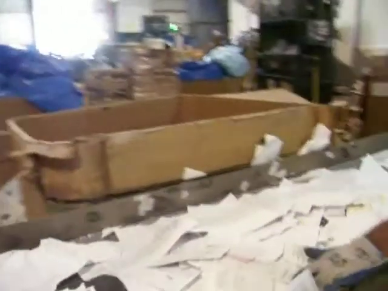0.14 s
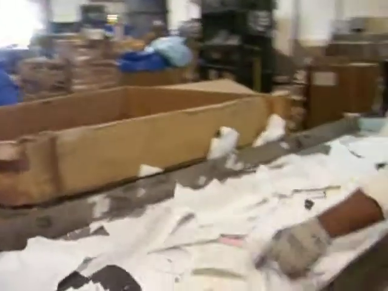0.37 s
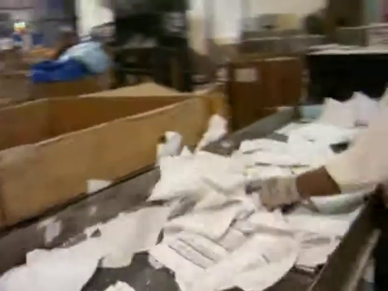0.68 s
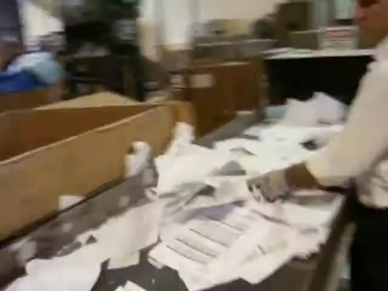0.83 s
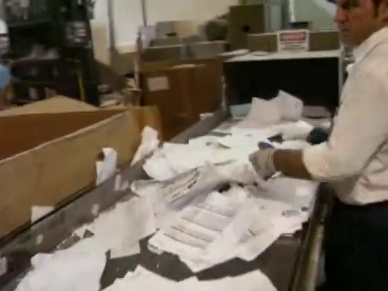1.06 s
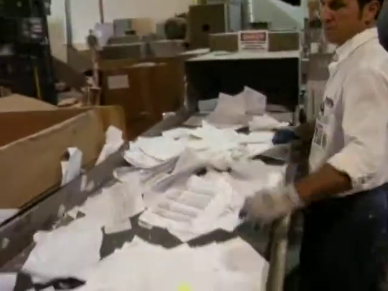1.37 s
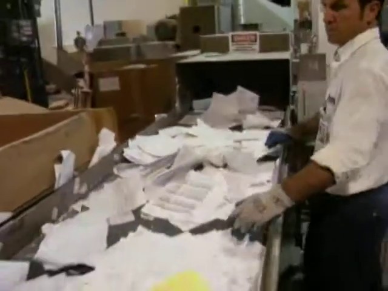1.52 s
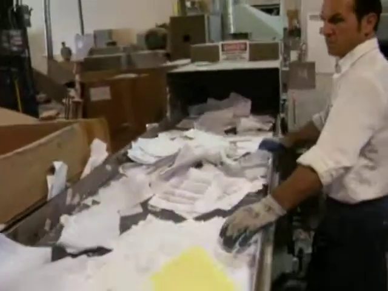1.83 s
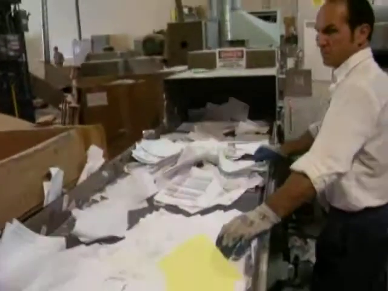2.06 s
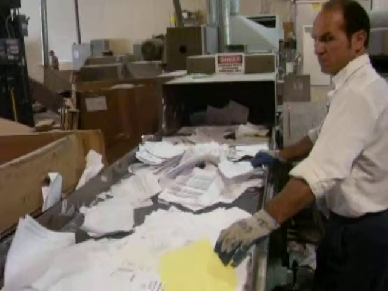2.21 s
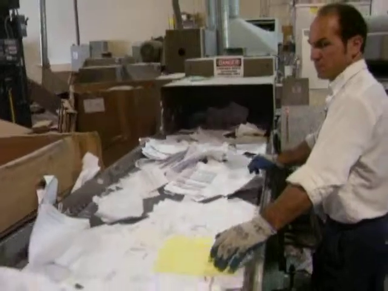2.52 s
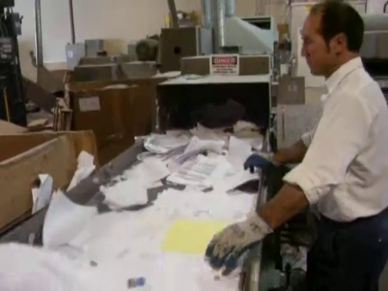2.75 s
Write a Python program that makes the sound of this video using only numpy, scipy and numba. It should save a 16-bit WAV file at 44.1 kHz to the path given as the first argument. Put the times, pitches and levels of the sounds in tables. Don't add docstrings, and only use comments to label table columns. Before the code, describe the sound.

A dense conveyor and shredder roar runs throughout, with wavering motor hum, blower tones and thin gear whine in a reverberant warehouse. Paper crushes and snaps around 0.45-0.6 s; dull knocks cluster at 0.6-1.0. Metal clangs and paper sound at 1.33-1.5, a hard knock at 2.26, the loudest paper crush at 2.4. The narrow, muffled camera microphone pumps, distorts and ticks.

```python
import sys
import numpy as np
from scipy import signal
from scipy.io import wavfile
from scipy.ndimage import uniform_filter1d
from numba import njit

SR = 44100
rng = np.random.default_rng(int(sys.argv[2]) if len(sys.argv) > 2 else 0)


def dump_mix(stems):
    frames = np.atleast_2d(stems).T
    limited = np.clip(frames, -1, 1)
    pcm = np.round(limited * 32767).astype(np.int16)
    wavfile.write(sys.argv[1], SR, pcm)


def invert_db(level):
    return 10 ** (np.asarray(level, dtype=float) / 20)


N = 126126


@njit
def svf(x, hz, width):
    y, band, low = np.empty(len(x)), 0., 0.
    g, k = np.tan(np.pi * hz / SR), width / hz
    for i in range(len(x)):
        v = (band + g * (x[i] - low)) / (1 + g * (g + k))
        band, low, y[i] = 2 * v - band, low + 2 * g * v, k * v
    return y


def noise_band(hz, width):
    noise = rng.standard_normal(N)
    return svf(svf(noise, 1. * hz, 1. * width), 1. * hz, 1. * width)


def level(x, db):
    return x * invert_db(db) / np.sqrt(np.mean(x ** 2))


def walk(rate):
    hold = int(SR / rate)
    steps = np.repeat(rng.standard_normal(N // hold + 1), hold)
    return 1.28 * uniform_filter1d(uniform_filter1d(steps, hold), hold)[:N]


def ring(start, hz, t60):
    t = np.maximum(np.arange(N) / SR - start, 0)
    return np.sin(2 * np.pi * hz * t) * np.exp(-np.log(1000) * t / t60)


# (frequency [Hz], density [dB per Hz])
ROAR_SPECTRUM = [(29, -52), (50, -7), (197, -10), (257, -0.5), (343, -8.5), (520, 1), (1280, -10),
                 (3150, -13.5), (3700, -12.5), (4810, -47.5), (8140, -120)]


def roar():
    swell_db, shared_db, flicker_db = -0.95, 0.3, 1.87
    swell = walk(2.513)
    shared = [walk(9.89) for _ in range(7)]
    hz_points, db_points = np.array(ROAR_SPECTRUM).T
    out = 0
    for k, hz in enumerate(50 * 2 ** (np.arange(20) / 3)):
        db = np.interp(np.log(hz), np.log(hz_points), db_points)
        motion = swell_db * swell + shared_db * shared[k // 3] + flicker_db * walk(20)
        out = out + noise_band(hz, hz / 3) * invert_db(db + motion)
    return level(out, -0.5)


# (frequency [Hz], width [Hz], level [dB])
HUM_LINES = [
    (109.4, 12, -26),
    (795.2, 42, -16.5),
    (355.2, 5.7, -21.5),
    (298, 7.7, -17),
    (942, 43, -16),
]


def motor_hum():
    return sum(level(noise_band(hz, width), db) for hz, width, db in HUM_LINES)


def wavering_tone(hz, db, phase, swing_db):
    t = np.arange(N) / SR
    return level(np.sin(2 * np.pi * hz * t + phase) * invert_db(swing_db), db)


# (time [s], swell [dB])
LOAD_SWELL = [(0, 8), (.2, 4.5), (.45, 3.5), (.7, -3), (1.0, 2), (1.3, -3), (1.6, 0.5), (1.95, 2), (2.1, 1),
              (2.3, 4), (2.55, -4), (2.86, 0)]
# (frequency [Hz], level [dB])
BLADE_TONES = [
    (264, -13),
    (528, -15.5),
]


def blower():
    swell = invert_db(np.interp(np.arange(N) / SR, *np.array(LOAD_SWELL).T))
    return swell * sum(wavering_tone(hz, db, 1.3 * walk(20), 3.8 * walk(15)) for hz, db in BLADE_TONES)


# (frequency [Hz], level [dB])
WHINE_TONES = [
    (1473, -48),
    (2067, -23.5),
    (2654, -23.5),
    (3241, -26.5),
]


def gear_whine():
    return sum(wavering_tone(hz, db, .8 * walk(6), 1.4 * walk(2.2)) for hz, db in WHINE_TONES)


# (time [s], level [dB], pitch [Hz])
FRAME_KNOCKS = [(0.014, -9, 548), (0.269, -13, 501), (0.624, -4.5, 682), (0.825, -4, 732),
                (0.918, -2.5, 947), (0.979, -8.5, 942), (1.004, -3, 743), (1.029, -15, 750),
                (1.385, -4.5, 815), (1.479, -10.5, 856), (1.504, -16.5, 517), (1.955, -6, 601),
                (2.259, 0.5, 526), (2.349, -3, 960), (2.746, -2.5, 500)]


def frame_knocks():
    t60 = 0.065
    out = 0
    for s, db, hz in FRAME_KNOCKS:
        pair = ring(s, hz, t60) + 0.83 * ring(s + .001, 1.1 * hz, .7 * t60)
        out = out + invert_db(db + 8.5) * pair
    return out


# (time [s], level [dB], pitch [Hz], ring time [s])
PANEL_CLANGS = [
    (1.46, 2.5, 640, 0.23),
    (1.49, 2, 600, 0.21),
    (1.33, -1, 1050, 0.15),
    (1.9, -4, 550, 0.3),
    (2.7, -4.5, 520, 0.45),
    (1.34, -2, 222, 0.09),
    (.8, -2.5, 920, 0.15),
    (.98, -1.5, 950, .35),
]


def panel_clangs():
    return sum(invert_db(db) * ring(s, hz, t60) for s, db, hz, t60 in PANEL_CLANGS)


# (start [s], length [s], level [dB])
PAPER_HANDFULS = [
    (0.285, 2.56, -12),
    (0.437, 0.19, -9),
    (0.492, 0.051, -2),
    (1.344, 0.22, -8.5),
    (1.405, 0.036, -6),
    (1.513, 0.019, -7),
    (1.987, 0.1, -14),
    (2.407, 0.039, 4),
    (2.441, 0.057, -2.5),
    (2.776, 0.064, -9),
]


def paper_crackle():
    t = np.arange(N) / SR
    creases = (rng.random(N) < 3500 / SR) * rng.standard_normal(N)
    creases = creases * invert_db(2.5 * rng.exponential(size=N))
    crackle = level(svf(creases, 3020., 5040.), 0)
    hand = 0
    for s, length, db in PAPER_HANDFULS:
        fade_in = np.clip((t - s) / .004, 0, 1)
        fade_out = np.clip((s + length - t) / 0.024, 0, 1)
        hand = hand + invert_db(db) * fade_in * fade_out
    return crackle * hand


# (time [s], level [dB])
SHEET_SNAPS = [(0.0165, -33.5), (0.3687, -40.5), (0.4567, -36), (0.4924, -32.5), (0.4995, -27),
               (0.5162, -32), (0.526, -25.5), (0.5276, -40.5), (0.5322, -26.0), (0.5474, -30),
               (0.5732, -34.5), (0.6197, -32), (0.629, -37), (0.919, -38), (1.355, -36.0), (1.368, -34),
               (1.4196, -27.5), (1.4285, -35.6), (1.4331, -37.5), (1.4443, -34), (1.4506, -40.5),
               (1.4767, -37), (1.5092, -36), (1.532, -36.2), (2.2614, -38), (2.2637, -38.5), (2.4116, -29),
               (2.4248, -24.5), (2.4544, -33), (2.8598, -26.5)]


def sheet_snaps():
    return sum(invert_db(8 + 0.59 * db) * ring(s, 1770, 0.012) for s, db in SHEET_SNAPS)


def hall(near):
    t = np.arange(int(.5 * SR)) / SR
    decay = np.exp(-np.log(1000) * t / 1)
    tail = svf(rng.standard_normal(len(t)), 790.0, 1700.0) * decay * (t > .008)
    return invert_db(-10) * signal.fftconvolve(near, tail / np.sqrt(np.sum(tail ** 2)))[:N]


def scene():
    machines = roar() + motor_hum() + blower() + gear_whine()
    near = frame_knocks() + panel_clangs() + paper_crackle() + sheet_snaps()
    return (machines + near + hall(near))[None]


# (time [s], gain [dB])
CAMERA_GAIN = [(0, -14), (.2, -15), (.5, -11.5), (.635, -10.5), (.65, -17.5), (.8, -18), (.825, -14.5),
               (1.26, -14), (1.34, -11.5), (1.54, -13), (1.555, -19), (1.86, -14.5), (1.92, -14.5),
               (2.47, -13.5), (2.51, -18), (2.6, -19), (2.7, -17.5), (2.86, -14.5)]
# (time [s], depth [dB], length [s])
GAIN_DUCKS = [
    (0.747, -2.5, 0.0077),
    (1.71, -6.5, 0.007),
    (1.838, -3, 0.01),
    (2.612, -8, 0.0064),
]


def pumping_gain(x):
    t = np.arange(N) / SR
    ducks = sum(db * np.exp(-.5 * ((t - s) / length) ** 2) for s, db, length in GAIN_DUCKS)
    return x * invert_db(np.interp(t, *np.array(CAMERA_GAIN).T) + ducks)


def microphone(x):
    x = signal.sosfilt(signal.butter(6, 3740, fs=SR, output="sos"), x)
    return signal.sosfilt(signal.butter(4, 87, "high", fs=SR, output="sos"), x)


def converter(x):
    up, down, top = 80, 441, .6
    low_rate = np.clip(signal.resample_poly(x, up, down), -top, top - .04)
    rebuild = signal.firwin(16001, 4060, window=("kaiser", 9.0), fs=SR * up)
    return signal.resample_poly(low_rate, down, up, window=rebuild)[:N]


# (time [s], level [dB])
GRAZE_EVENTS = [(.4625, -27.5), (.510, -32), (.578, -30), (.595, -33), (.622, -22), (.636, -32),
                (.639, -40), (.929, -30), (1.001, -34), (1.007, -24), (1.364, -27), (1.424, -32),
                (1.447, -34), (1.486, -30), (1.500, -34), (1.524, -29), (1.98, -40), (2.408, -34),
                (2.442, -31), (2.459, -30)]
# (time [s], level [dB])
OVERLOAD_THUMPS = [
    (.01, -30),
    (.28, -29),
    (.52, -26),
    (.59, -23),
    (1.33, -28),
    (1.41, -22),
    (1.49, -30),
    (2.26, -29),
    (2.43, -26),
    (2.85, -31),
]


def overload_ticks():
    t = np.arange(N) / SR
    ticks = sum(invert_db(db + 9) * np.maximum(1 - ((t - s) / .000038) ** 2, 0) for s, db in SHEET_SNAPS)
    grazes = sum(invert_db(db) * np.exp(-.5 * ((t - s) / .00006) ** 2) for s, db in GRAZE_EVENTS)
    thumps = sum(invert_db(db) * np.exp(-.5 * ((t - s) / .004) ** 2) for s, db in OVERLOAD_THUMPS)
    return ticks + grazes + thumps


def roll_off(x):
    return signal.sosfilt(signal.butter(12, 15900, fs=SR, output="sos"), x)


def record(dry):
    x = converter(microphone(pumping_gain(dry[0])))
    mix = (x - overload_ticks())[None]
    return roll_off(mix)


dry = scene()
out = record(dry)
dump_mix(out)
```